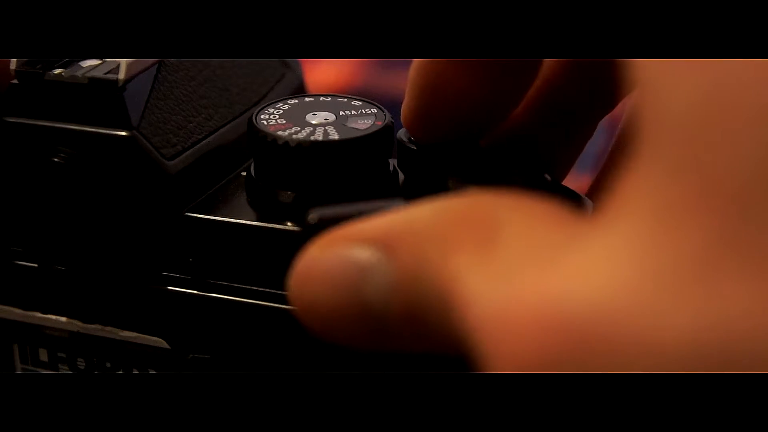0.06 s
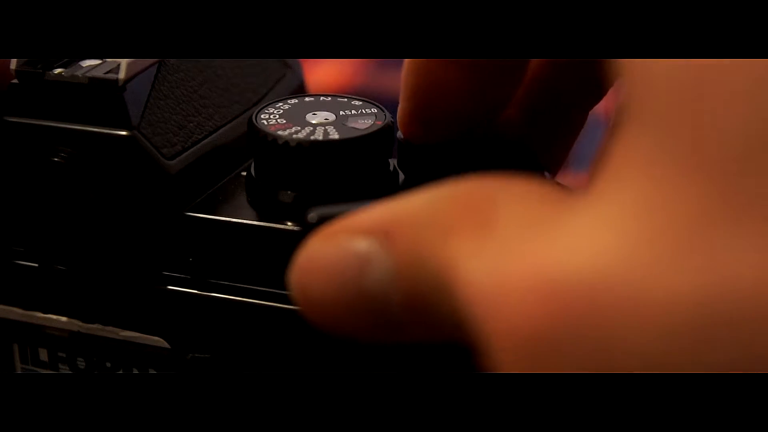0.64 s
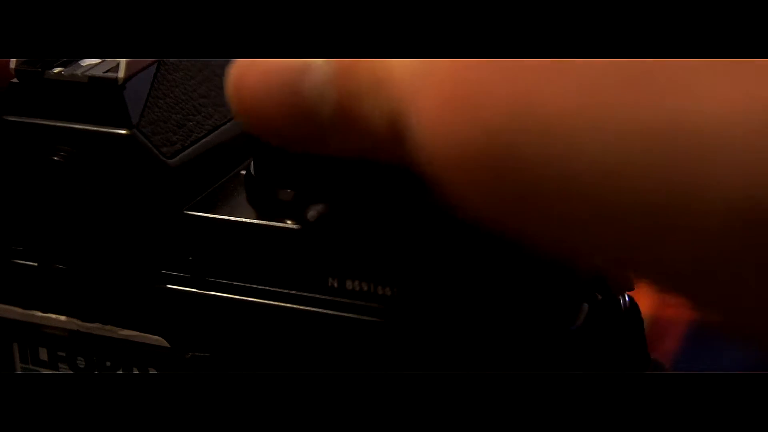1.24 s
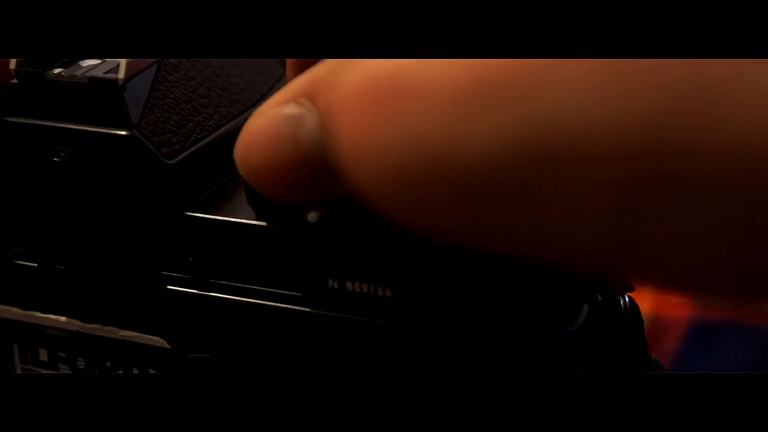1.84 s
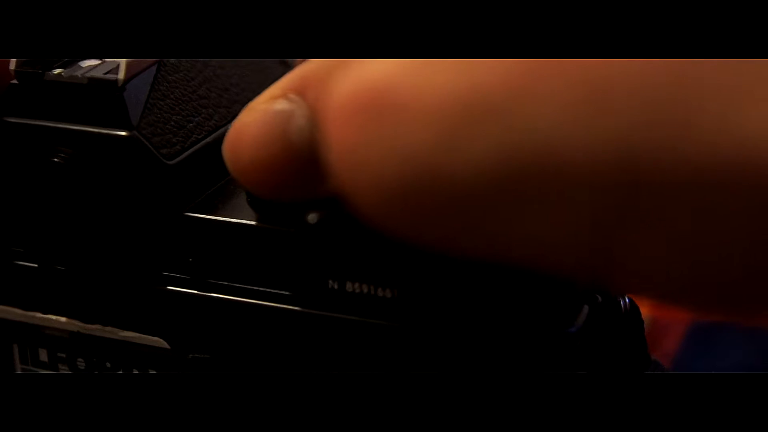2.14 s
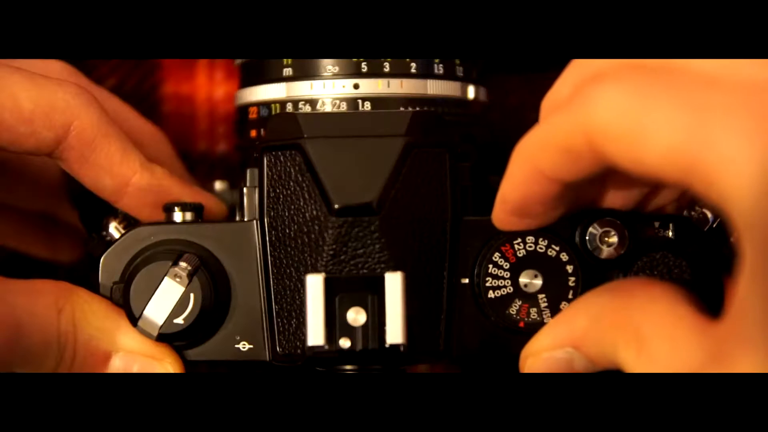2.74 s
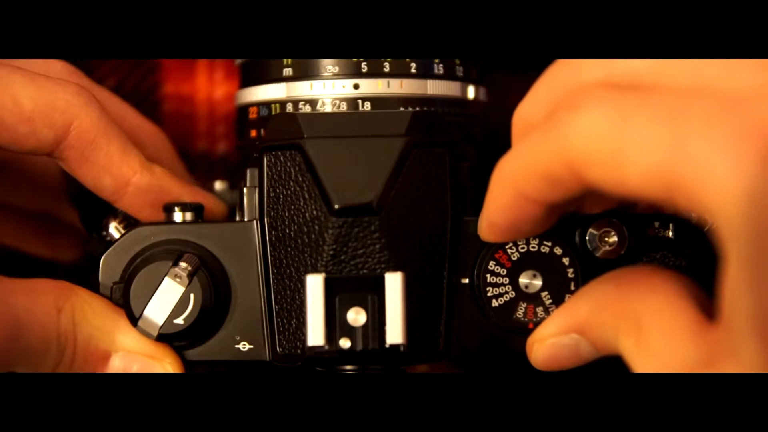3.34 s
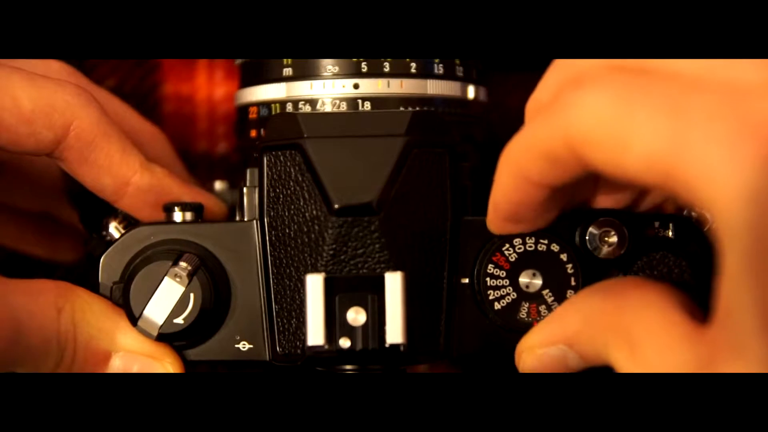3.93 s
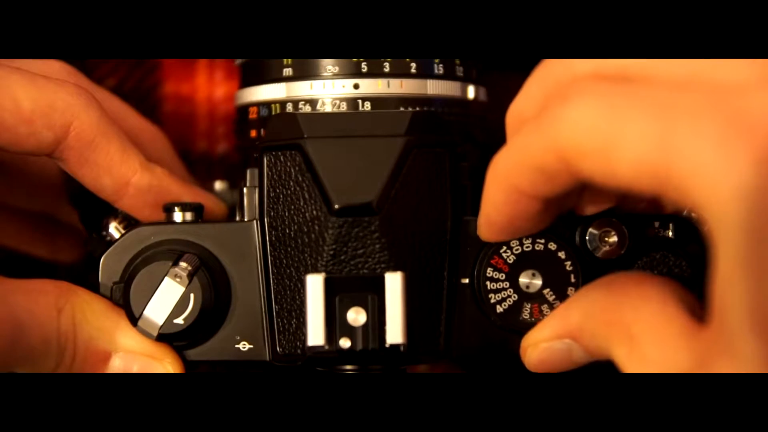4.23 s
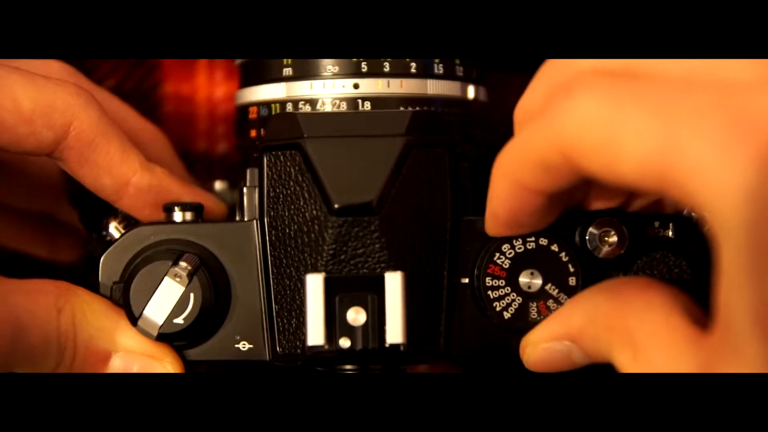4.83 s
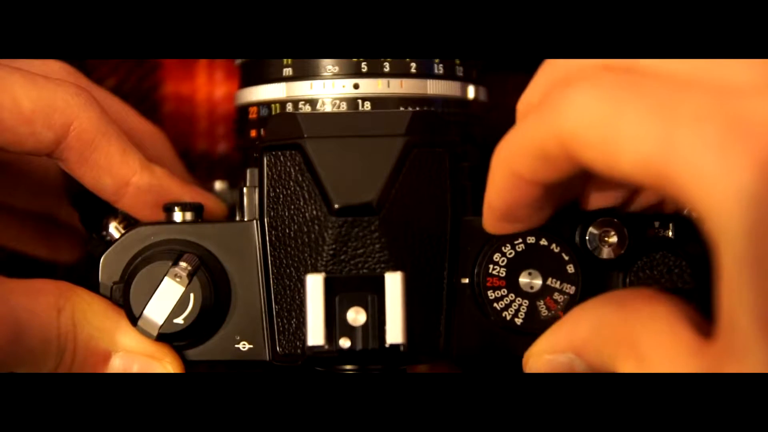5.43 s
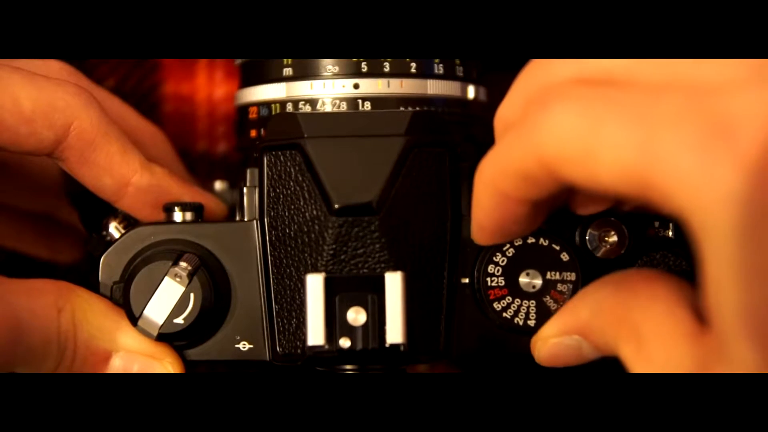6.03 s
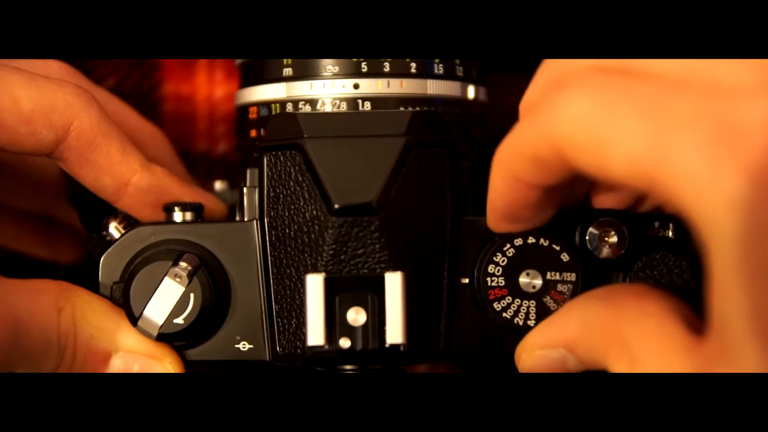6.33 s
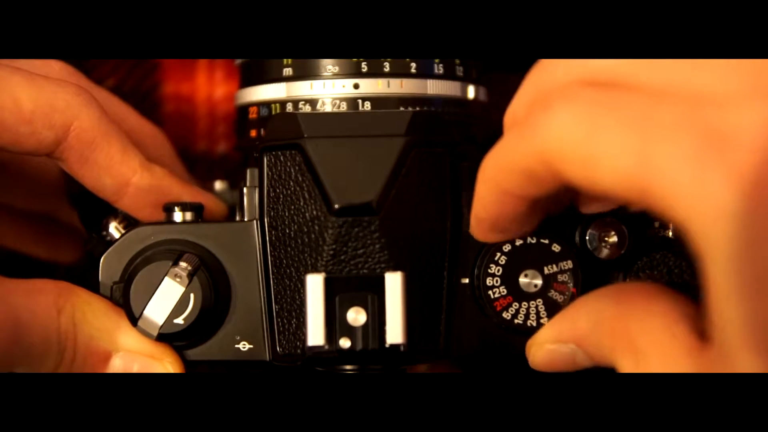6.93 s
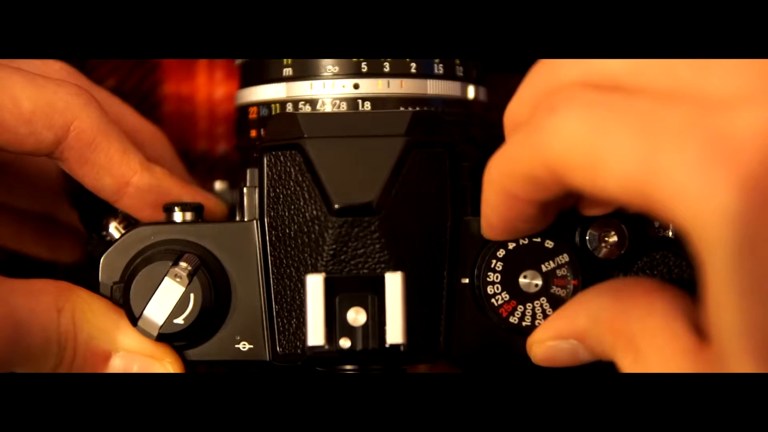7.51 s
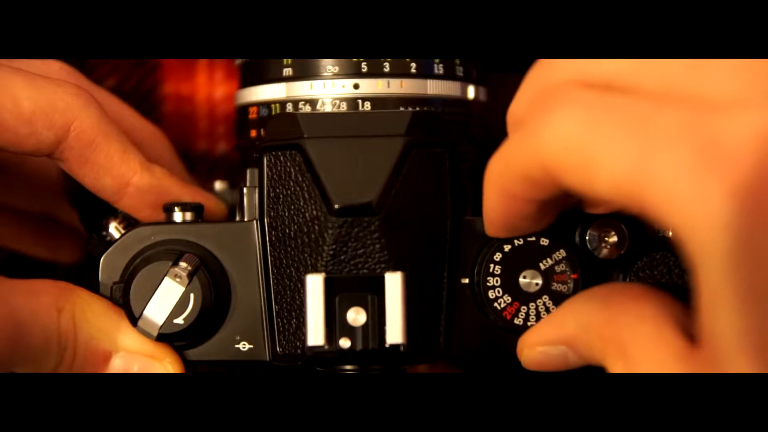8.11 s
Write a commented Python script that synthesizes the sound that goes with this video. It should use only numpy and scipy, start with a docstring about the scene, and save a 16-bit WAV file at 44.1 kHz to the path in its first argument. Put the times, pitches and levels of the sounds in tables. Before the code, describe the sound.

Over the low hum of a fan in a small room, a film camera's shutter goes off in one loud, rattling metallic burst, and its button comes softly back up. Then fingers turn the speed dial one notch at a time, seven times, with faint handling knocks and bright snaps that ping briefly. The first notch is softer and scrapes a little. Everything is heard close up, with very little reverberation.

```python
"""A low fan hum in a small room, and at once the close clatter of a mechanical film camera firing.
Mirror and curtains slam into their stops, ring the frame and thump the table; the button comes back up.
Then the speed dial is turned through seven stops: fingers take up its play with a dull knock,
the catch scrapes or ticks, and the detent snaps home with a ping of its spring.
Each hit is a burst of tiny rebounds coloured by the struck part; the ringing is fading sines and noise."""
import sys
import numpy as np
from scipy import signal
from scipy.fft import rfft, irfft, next_fast_len
from scipy.io import wavfile
from scipy.ndimage import uniform_filter1d

SR = 44100
rng = np.random.default_rng(int(sys.argv[2]) if len(sys.argv) > 2 else 0)


def pcm_store(signal):
    """Save signal as 16-bit PCM."""
    levels = np.round(np.clip(np.atleast_2d(signal), -1, 1) * 32767)
    wavfile.write(sys.argv[1], SR, levels.astype(np.int16).T)


N = 360297
RING_T = np.arange(2 ** 14 + 2 ** 13) / SR  # time axis of one hit and its tail

# mirror and curtain hits: t/s, level/dB, bounce delay/ms, bounce/dB re hit, tilt/dB per octave, recoil/dB
SHUTTER_HITS = [(.3885, -6, 1.8, -15, -.5, -35), (.3991, 1.5, 3.8, -1.5, -1, -18),
                (.4125, -17, 8, -6, 0, -33), (.431, 0, 4, 1.5, 3, -23), (.4423, -1.5, 4.8, -7, -1, -40),
                (.4624, 3, 3.4, -18, 1, -22), (.490, -5, 6.8, -3, -1.5, -31), (.5045, -9, 5.5, -12, 0, -24)]
# knocks of the returning button: t/s, level/dB, rattle/ms, tilt/dB per octave
BUTTON_KNOCKS = [(.751, -28, 12, -4), (.782, -26, 3.3, 2), (.786, -20, 6.1, .5), (1.014, -35, 16, -5)]
# fingers gripping the dial: t/s, knock/dB, touch lead/ms, touch/dB, body jolt/dB
DIAL_GRIPS = [(2.1124, -26.5, 4.4, -32, -30), (3.3155, -26, 1.5, -29, -23.5), (4.2975, -31, 1.5, -32, -26),
              (5.062, -31, 3, -29, -26), (5.8994, -24, 4.2, -31, -27.5), (6.696, -33, 7.5, -29.5, -38),
              (7.4962, -26.5, 7.2, -28.5, -29)]
# the detent dropping home: t/s, snap/dB, tilt/dB per octave, snap pitch ratio, top plate/dB, spring/dB
DETENT_DROPS = [(2.2951, -15, -1.5, .92, -23, -25), (3.569, -5, .5, 1, -15.5, -19.5),
                (4.398, -6, 1.5, 1, -14, -17.5), (5.1848, -4, -1, .96, -20.5, -23),
                (5.97, -6.5, 2, .94, -16.5, -21), (6.7723, -9.5, 1.5, .92, -16, -31),
                (7.637, -10.5, -1, .99, -15, -32)]


def undb(db):
    """Decibels to gain."""
    return 10 ** (np.asarray(db) / 20)


def unit(x):
    """Scale to rms 1."""
    return x / np.sqrt(np.mean(x ** 2))


def add(track, s, sound):
    """Mix a sound into the track from time s."""
    i = int(round(s * SR))
    track[i:i + len(sound)] += sound[:N - i]


def colour(x, points, tilt_db=0):
    """EQ through (f/Hz, level/dB) points, tilted by tilt_db per octave around 5 kHz."""
    size = next_fast_len(len(x))
    octave = np.log2(np.maximum(np.fft.rfftfreq(size, 1 / SR), 1))
    hz, db = np.transpose(points)
    tilt = tilt_db * np.maximum(octave - np.log2(5000), -2)
    gain = undb(np.interp(octave, np.log2(hz), db) + tilt)
    # minimum phase keeps attacks crisp: nothing rings ahead of the hit
    cepstrum = irfft(np.log(gain), size)
    cepstrum[1:size // 2] *= 2
    cepstrum[size // 2 + 1:] = 0
    return irfft(rfft(x, size) * np.exp(rfft(cepstrum)), size)[:len(x)]


def whiten(force):
    """Flatten the spectrum of a run of contacts, so that the struck part alone sets the colour."""
    power = uniform_filter1d(np.abs(rfft(force)) ** 2, size=500)
    hz = np.fft.rfftfreq(len(force), 1 / SR)
    return colour(force, np.column_stack([hz, -10 * np.log10(power)])[1:])


def fade(t60):
    """Free decay, 60 dB down after t60 seconds."""
    return np.exp(-np.log(1000) * RING_T / t60)


def modes(table):
    """A struck part rings as a sum of fading sines."""
    return sum(undb(db) * fade(t60) * np.sin(2 * np.pi * hz * RING_T) for hz, db, t60 in table)


def dense_ring(points, t60):
    """Modes too many to tell apart, fading together."""
    return unit(colour(rng.standard_normal(len(RING_T)), points)) * fade(t60)


def blow(points, rattle_ms, tilt_db=0, *, spike, tail_db, tail_t60, rise_ms):
    """Metal meets metal: one hard spike of contact, a rattle of uneven rebounds and a faint tail."""
    ms = RING_T * 1000
    attack = 1 - np.exp(-ms / rise_ms)
    decay = np.exp(-ms / max(rattle_ms, .2)) + undb(tail_db) * fade(tail_t60)
    rebounds = unit(rng.standard_normal(len(ms)) * undb(3.36 * rng.standard_normal(len(ms))))
    force = rebounds * attack * decay
    force[np.searchsorted(ms, rise_ms)] += spike
    click = colour(whiten(force), points, tilt_db)
    return click / np.sqrt(np.sum(click ** 2) / (SR * 2 / 1000))  # the energy of 2 ms at rms 1


def fan():
    """A bed of air noise, fan drone and hum; it steps up a little early in the dial turning."""
    # rush of air: f/Hz, level/dB
    air_eq = [(15, -20), (36, 0.5), (60, -1.5), (130, -1), (250, -1.5), (400, -5.5), (700, -10.5),
              (1400, -17), (2000, -17.5), (3100, -24.5), (7000, -30.5), (15500, -34)]
    # noise bands of the drone: f/Hz, width/Hz, early level/dB, late level/dB
    drone_bands = [(96, 20, -63, -47), (119.8, 10.4, -49.5, -49), (213, 20, -54, -50.5),
                   (264.1, 3.5, -59.5, -51), (287.4, 19.5, -53.5, -57.5), (527, 30, -66.5, -56),
                   (1940, 370, -63.5, -61)]
    # motor and mains tones: f/Hz, early level/dB, late level/dB
    hum_tones = [(119.3, -60, -51), (120.2, -49.5, -42.5)]
    t = np.arange(N) / SR
    late = np.clip((t - 2.65) / .026, 0, 1)
    out = unit(colour(rng.standard_normal(N), air_eq)) * undb(-38.5 - 2.5 + 1.24 * late)
    size = next_fast_len(N)
    f = np.fft.rfftfreq(size, 1 / SR)
    for hz, width, early_db, late_db in drone_bands:
        band = np.exp(-2 * ((f - hz) / width) ** 2)
        phases = np.exp(2j * np.pi * rng.random(len(f)))
        drone = unit(irfft(band * phases, size)[:N])
        out += drone * undb(early_db + (late_db - early_db) * late)
    for hz, early_db, late_db in hum_tones:
        hum = unit(np.sin(2 * np.pi * (hz * t + rng.random())))
        out += hum * undb(early_db + (late_db - early_db) * late)
    return out


def room(x, wet_db, t60):
    """Add a short diffuse tail that builds up over the first reflections."""
    # tone of the reverb: f/Hz, level/dB
    room_eq = [(150, -5), (1000, 4), (3000, -4.5), (5500, -3.5), (8000, -3), (12000, -7), (16000, -17)]
    tail = dense_ring(room_eq, t60) * (1 - np.exp(-RING_T / .0098))
    tail /= np.sqrt(np.sum(tail ** 2))
    return x + undb(wet_db) * signal.fftconvolve(x, tail)[:N]


def thumps():
    """Low-end weight: shutter and button boom in the table; the dial only nudges the camera body."""
    # resonances of the table: f/Hz, level/dB, t60/s
    table_modes = [(70.2, -3, 0.46), (84.2, 0, 0.47), (118, -5.5, 0.33), (171.2, -4.5, 0.4),
                   (242, -9.5, 0.052)]
    # resonances of the camera body: f/Hz, level/dB, t60/s
    body_modes = [(97, -3, 0.33), (77, -6, 0.29)]
    out = np.zeros(N)
    table, body = modes(table_modes), modes(body_modes)
    for s, *_, recoil_db in SHUTTER_HITS:
        add(out, s + .008, undb(recoil_db) * table)
    for s, db, *_ in BUTTON_KNOCKS:
        add(out, s + .024, undb(db - 14) * table)
    for s, *_, jolt_db in DIAL_GRIPS:
        add(out, s, undb(jolt_db) * body)
    for s, db, *_ in DETENT_DROPS:
        add(out, s, undb(db - 24) * body)
    low_cut = signal.butter(4, 55, "high", fs=SR, output="sos")  # neither radiates deep bass
    return signal.sosfilt(low_cut, out)


def knock(rattle_ms, tilt_db=0):
    """A loose part knocks dully in its play."""
    # tone of the loose part: f/Hz, level/dB
    knock_eq = [(250, -11.5), (700, -2), (1000, 3), (1400, -8), (2300, -3.5), (4300, -2), (5300, 2.5),
                (6300, -2.5), (7500, -15), (9200, -13), (15000, -26)]
    return blow(knock_eq, rattle_ms, tilt_db, spike=1, tail_db=-25, tail_t60=.11, rise_ms=.39)


def tick(rattle_ms, tilt_db):
    """The catch meets a tooth, dry and bright."""
    # tone of the catch: f/Hz, level/dB
    tick_eq = [(500, -24), (1400, -22), (2400, -8.5), (3300, -11), (3900, -2), (5000, -7.5), (6300, 2),
               (7700, -11), (10200, -8.5), (12000, -10.5), (13000, -8), (15000, -24)]
    return blow(tick_eq, rattle_ms, tilt_db, spike=2.2, tail_db=-24, tail_t60=.078, rise_ms=.4)


def button():
    """The shutter button comes back up in a few soft knocks."""
    out = np.zeros(N)
    for s, db, rattle_ms, tilt_db in BUTTON_KNOCKS:
        add(out, s, undb(db) * knock(rattle_ms, tilt_db))
    return out


def dial_handling():
    """Detail around the stops: a loose touch, a firm grip, ticks of the catch and the fingers easing off."""
    # the catch ticking against a tooth: t/s, level/dB
    catch_ticks = [(3.357, -35), (3.38, -12), (4.356, -15), (5.166, -12), (5.952, -29), (5.9582, -13.5),
                   (6.7553, -29.5), (6.762, -14), (7.6146, -17.5)]
    out = np.zeros(N)
    for s, db, lead_ms, touch_db, _ in DIAL_GRIPS:
        add(out, s - lead_ms / 1000, undb(touch_db) * knock(rattle_ms=3.8))
        add(out, s, undb(db) * knock(rattle_ms=1.8, tilt_db=1.5))
    for s, db in catch_ticks:
        add(out, s, undb(db) * tick(rattle_ms=1.6, tilt_db=3.2 + .31 * db))  # softer ticks are duller
    for s, db, *_ in DETENT_DROPS:
        add(out, s - 4.1 / 1000, undb(-21) * tick(rattle_ms=3.1, tilt_db=-3))  # the catch slides off
        add(out, s + .26, undb(db - 37.5) * knock(rattle_ms=7))  # the fingers relax
    return out


def dial_scrape():
    """Under a covering hand, the dial scrapes over its first stop in three quick slips."""
    # tone of the scrape: f/Hz, level/dB
    scrape_eq = [(500, -20.5), (1000, -14), (2200, -21), (3100, -16), (3500, -3), (4200, 3.5), (4650, -12),
                 (5200, 0.5), (5600, -4), (6100, -10), (7500, -15), (8600, -22), (13000, -14), (15500, -22)]
    start_s, gap_ms = 2.2889, 3.2
    out = np.zeros(N)
    for i in range(3):
        slip = blow(scrape_eq, rattle_ms=1.6, spike=1.3, tail_db=-31, tail_t60=.067, rise_ms=.7)
        add(out, start_s + i * gap_ms / 1000, undb(-11.5) * slip)
    return out


def detents():
    """The detent snaps into its notch and knocks the top plate; its spring pings and the dial shimmers."""
    # tone of the snap: f/Hz, level/dB
    snap_eq = [(350, -23), (1000, -16.5), (1350, -26.5), (2400, -9.5), (3200, -9.5), (3850, -0.5),
               (4600, -8.5), (5200, 1), (6300, 1), (6800, -14), (8500, -13.5), (10900, -20), (12500, -30),
               (15500, -29)]
    # tone of the top plate: f/Hz, level/dB
    plate_eq = [(300, -30), (650, -7.5), (1020, -1.5), (1350, -11), (1900, 0), (2600, 2.5), (3300, -10),
                (5000, -13), (7500, -12), (9500, -4), (15000, -15.5)]
    # tone of the ringing dial: f/Hz, level/dB
    shimmer_eq = [(400, -17), (900, 7), (1400, -3), (3800, -5), (5000, 10), (6200, 1), (7200, -34),
                  (11000, -23), (15000, -27.5)]
    # resonances of the spring: f/Hz, level/dB, t60/s
    spring_modes = [(4300, 3.5, 0.099), (5050, -18, 0.056), (4990, -23, 0.29), (5130, -25.5, 0.43),
                    (5830, -28.5, .21), (6800, -8.5, 0.063)]
    spring = modes(spring_modes)
    out = np.zeros(N)
    for s, db, tilt_db, pitch, plate_db, spring_db in DETENT_DROPS:
        pitched_eq = np.array(snap_eq) * [pitch, 1]
        rattle_ms = 1.05 - .11 * db  # a softer snap takes longer to seat
        snap = blow(pitched_eq, rattle_ms, tilt_db, spike=2.37, tail_db=-30, tail_t60=.037, rise_ms=.25)
        plate = blow(plate_eq, rattle_ms=2.7, spike=5.6, tail_db=-16, tail_t60=.08, rise_ms=.392)
        shimmer = undb(-26 + .62 * db) * dense_ring(shimmer_eq, t60=.19)  # a harder snap rings more
        add(out, s, undb(db) * snap + undb(plate_db) * plate + undb(spring_db) * spring + shimmer)
    return out


def shutter():
    """A latch lets go, then mirror and curtains slam into their stops, bounce once and ring the frame."""
    # tone of the release latch: f/Hz, level/dB
    latch_eq = [(600, -17), (1000, -5), (1400, -22.5), (2300, -8.5), (3250, 3), (3850, -9.5), (4400, 3.5),
                (4900, -12), (5300, 4.5), (6000, -6), (6450, -0.5), (7100, -5), (9000, -16), (15500, -16)]
    # tone of mirror and curtains: f/Hz, level/dB
    shutter_eq = [(100, -9), (450, -9.5), (700, -9), (1000, -1.5), (1300, -11.5), (1800, 0), (2500, -5),
                  (3300, 0), (4100, -0.5), (5300, 0.5), (6500, -0.5), (8400, -11.5), (10500, -9.5),
                  (15500, -20.5)]
    # resonances of the camera frame: f/Hz, level/dB, t60/s
    frame_modes = [(1030, -2.5, .04), (1054, -15, 0.146), (1491, -12.5, 0.2), (1743, 0, 0.0605),
                   (1841, -8, 0.14), (2260, -7, 0.18), (3410, -4, .04), (3640, -1, 0.042), (4190, -1, .1),
                   (4460, -4, 0.18), (5100, -6, .1), (5383, -5, .16), (5560, 0, .06), (5625, -5, .1),
                   (6140, -5, 0.152), (6200, 1, 0.19)]
    out = np.zeros(N)
    latch = blow(latch_eq, rattle_ms=1.8, spike=3.2, tail_db=-37.5, tail_t60=.17, rise_ms=.63)
    add(out, .3548, undb(1.6) * latch)
    for hit_s, hit_db, gap_ms, bounce_db, tilt_db, _ in SHUTTER_HITS:
        rattle_ms = .6 * gap_ms  # loose parts both bounce and rattle slowly
        for s, db in (hit_s, hit_db), (hit_s + gap_ms / 1000, hit_db + bounce_db):
            click = blow(shutter_eq, rattle_ms, tilt_db, spike=1.3, tail_db=-23, tail_t60=.14, rise_ms=.55)
            # random polarities give each hit its own ring
            frame = sum(rng.choice([-1, 1]) * modes([mode]) for mode in frame_modes)
            add(out, s, undb(db) * (undb(-1.94) * click + undb(-26) * frame))
    return out


def scene():
    """One close microphone feeds both channels; only a very faint hiss differs between them."""
    shot = room(shutter(), wet_db=-18, t60=.29)
    controls = room(button() + dial_handling() + dial_scrape() + detents(), wet_db=-21, t60=.26)
    mono = shot + controls + thumps() + fan()
    hiss = undb(-66) * rng.standard_normal((2, N))
    return mono + hiss


def record(dry):
    """The loudest hits clip, and a steep high cut takes off the very top."""
    high_cut = signal.ellip(10, .1, 70, 15900, fs=SR, output="sos")
    return signal.sosfilt(high_cut, np.clip(dry, -1, 1))


dry = scene()
out = record(dry)
pcm_store(out)
```